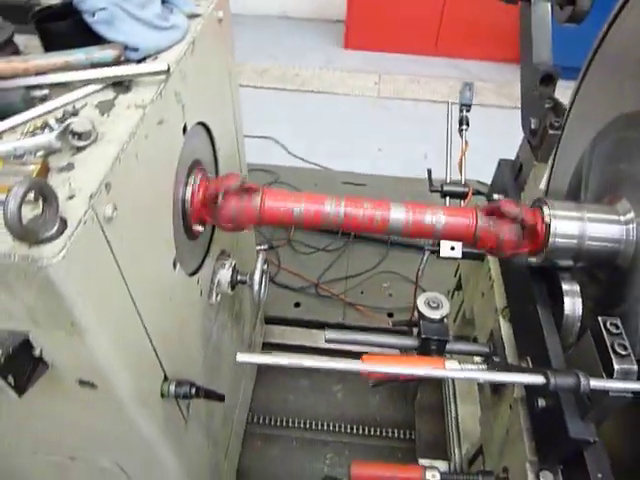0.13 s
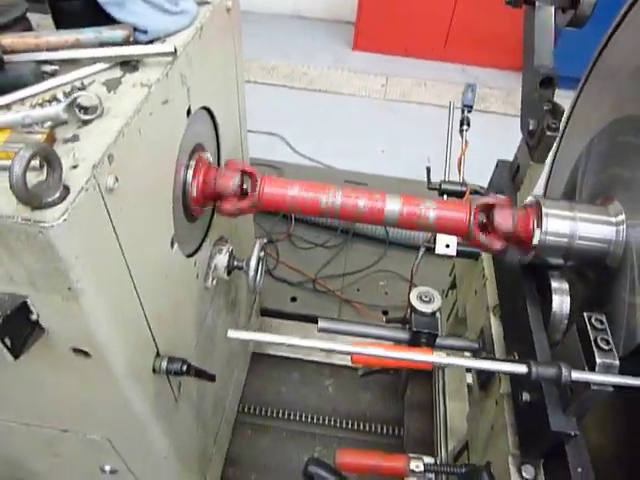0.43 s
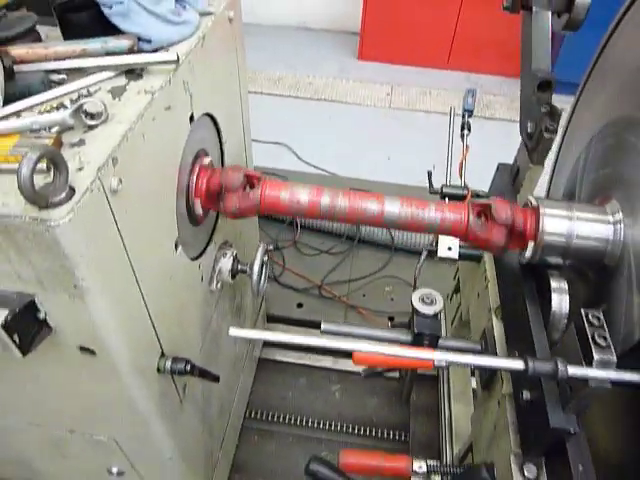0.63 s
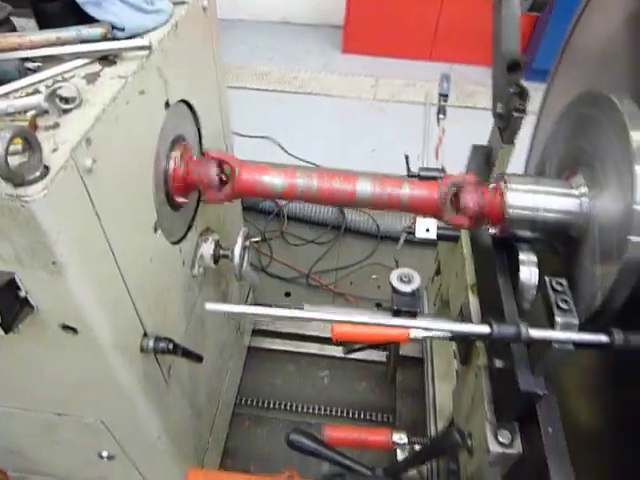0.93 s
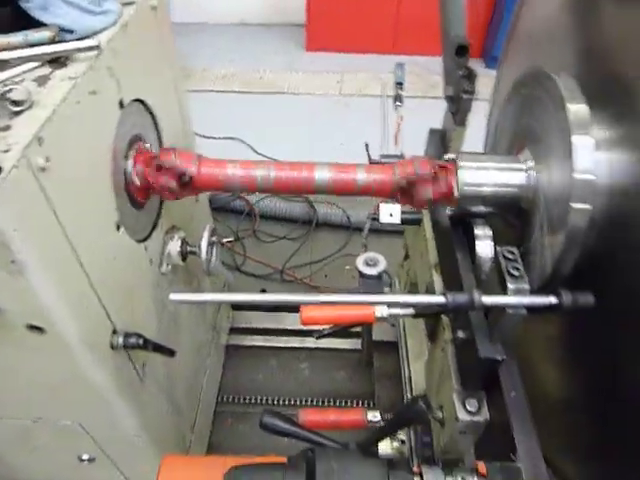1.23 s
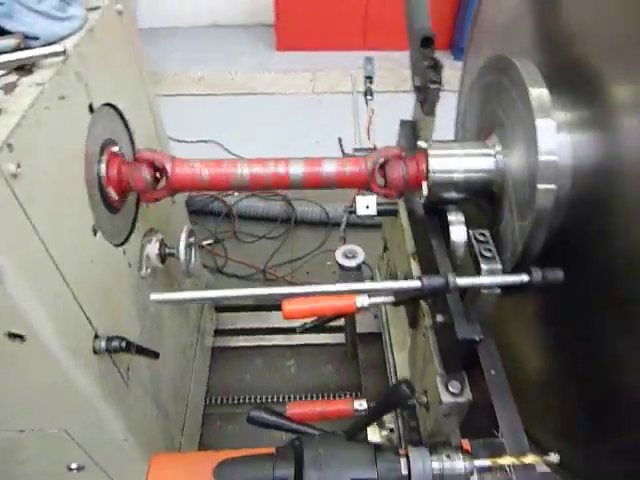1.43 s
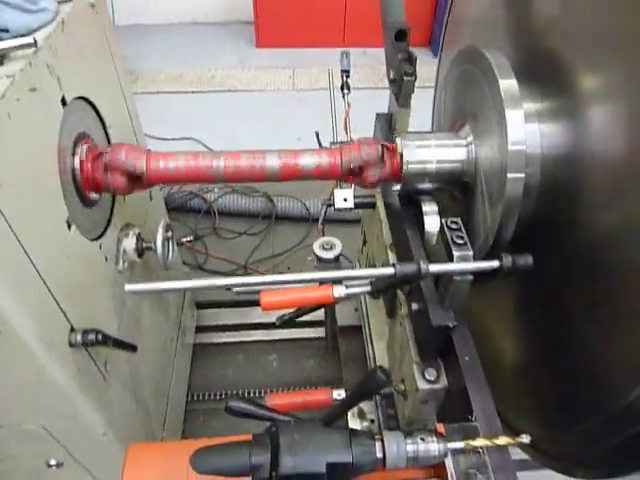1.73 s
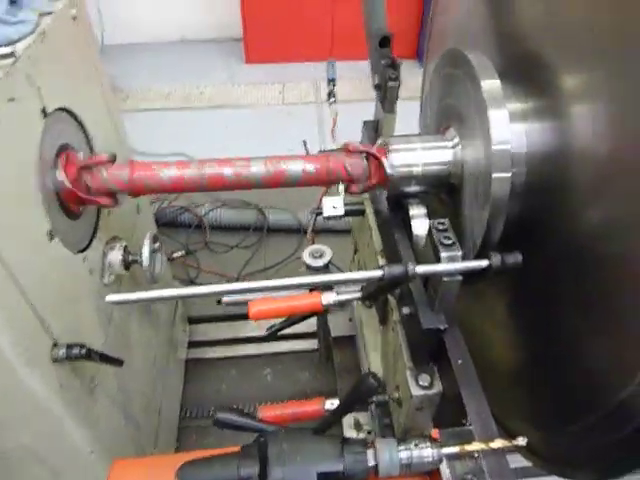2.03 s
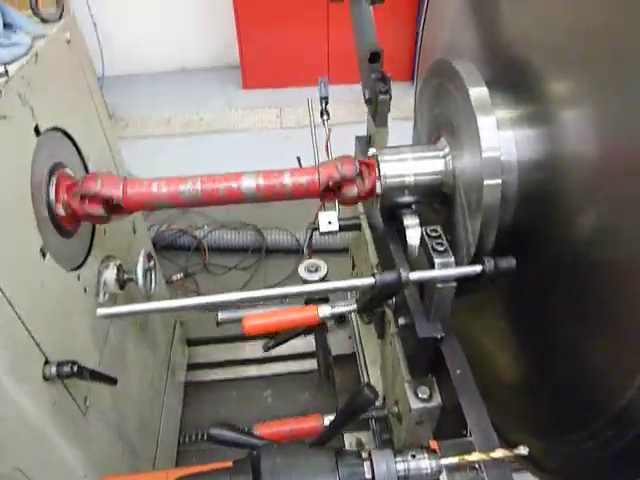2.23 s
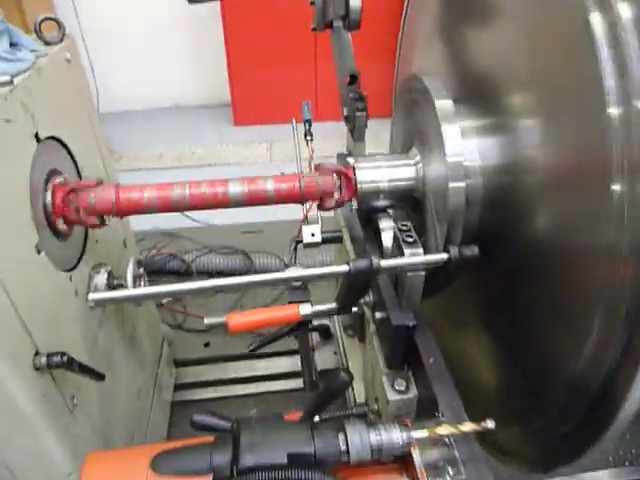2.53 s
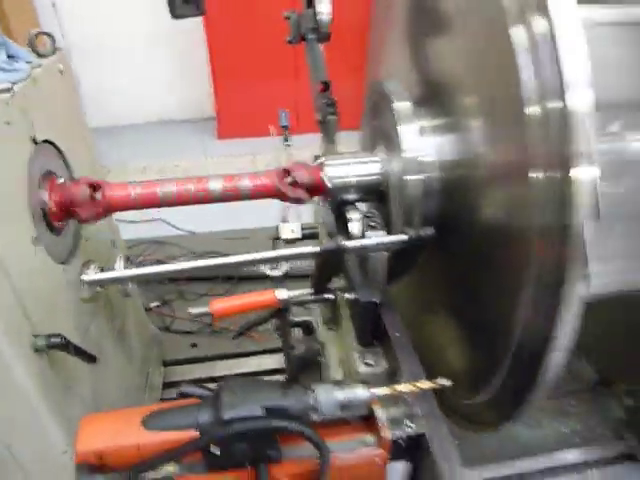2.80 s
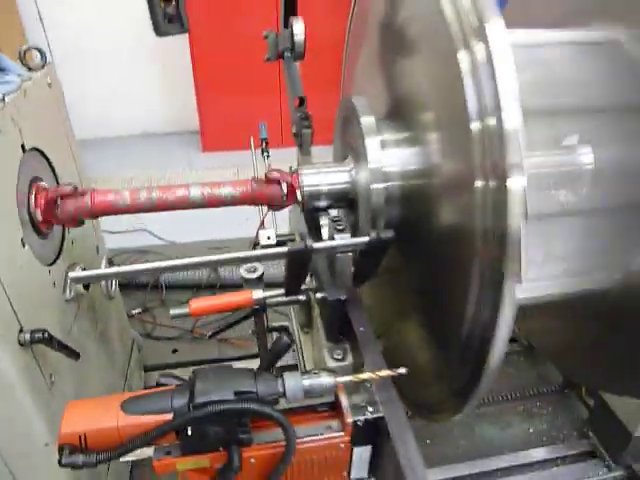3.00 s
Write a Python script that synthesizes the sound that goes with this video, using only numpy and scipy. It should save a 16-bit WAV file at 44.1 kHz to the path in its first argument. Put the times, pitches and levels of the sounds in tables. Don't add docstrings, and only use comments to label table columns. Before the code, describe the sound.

A heavy rotating machine hums loudly and steadily, low and buzzy, over bearing rumble and soft air rush. A tool clacks once early on; the drone then swells and pulses. Indoor workshop, close handheld camera, dull treble.

```python
import sys
import numpy as np
from scipy import signal
from scipy.fft import rfft, irfft, next_fast_len
from scipy.io import wavfile
from scipy.ndimage import uniform_filter1d, map_coordinates

SR = 44100
rng = np.random.default_rng(int(sys.argv[2]) if len(sys.argv) > 2 else 0)


def wav_out(sig):
    wavfile.write(sys.argv[1], SR, np.round(np.clip(np.atleast_2d(sig).T, -1, 1) * 32767).astype(np.int16))


def linear_from_db(decibels):
    return 10 ** (np.asarray(decibels, float) / 20)


N = 139356

# frequency in Hz, density in dB per Hz.
RUMBLE_SPECTRUM = [(15, -67), (25, -52), (107, -9), (179, -8.5), (294, -4.5), (402, -3), (578, -10.5),
                   (904, -13), (1300, -24.5), (1690, -55.5), (2860, -120)]
AIR_SPECTRUM = [(500, -23.5), (1000, 0.5), (1500, 1), (2300, 1), (2800, -7), (4800, -11), (7000, -16),
                (7900, -18.5)]
RUMBLE_DB, AIR_DB = -29.5, -35.5
# frequency in Hz, correlation from 0 to 1.
PORT_LIKENESS = [(200, 1), (330, .9999), (450, .9993), (600, .997), (920, .978), (1580, .85), (2720, .7),
                 (8000, .12)]
# frequency in Hz, difference in dB.
LEFT_OVER_RIGHT_DB = [(60, 0), (530, 0), (920, -1), (1580, -.5), (2720, 0), (4700, 3), (8100, 1)]

# frequency in Hz, wander in Hz, rms in dB, loudest at in seconds,
# again after in seconds.
WHINES = [(782, 4, -50, 1.9, 3.2), (1615, 1.5, -54, .25, 2.8), (2162, 2, -55, 1.5, 2.6),
          (2208, 4, -51, .6, 1.5), (2541, 4, -60, 1, 2), (2788, 8, -61, 2, 2), (5713, 5, -60, 2.05, 3.6)]
# multiple of the ripple, rms in dB, left over right in dB, loudest at in seconds,
# again after in seconds.
BUZZ = [(1, -33, 0, 2.4, 3), (2, -57, 0, 1, 2), (3, -41.5, -.5, 1.5, 1), (4, -55, 0, 2.3, 2.2),
        (5, -53, 2, 1.2, 1.2), (6, -55, 0, .9, .9), (7, -50, 3, 1.5, 3), (8, -49, 4, 1.7, 3),
        (9, -65, 2, 1, 1.5), (10, -61, -2, 2.85, 2), (11, -59, 3, .45, 3.6), (12, -61, 4, 2.7, 1.9),
        (14, -59, 5, 3.05, .74), (15, -62, 7, 1.4, 3.2), (16, -63, 8, 1.5, 3.6), (17, -74, 2, 1, 1),
        (18, -62, 3, 1, 1.3), (19, -70, -1, 2, 1.8), (20, -71, 6, 1, 3.6), (21, -71, 4, .5, 1.6),
        (22, -67, 1, 2, 1.6), (23, -68, 2, 1, 1.4), (24, -71, 5, 1.1, 1), (25, -74, 6, 2, 1.5),
        (26, -74, 3, 1, 1)]
# multiple of a third of the ripple, rms in dB, loudest at in seconds,
# again after in seconds.
RIPPLE_THIRDS = [(40, -66, .5, 1.7), (44, -66, 1.5, 2), (46, -67, 2.5, 1.5), (49, -64, 1.88, 1.05),
                 (55, -72, 1, 1.2), (67, -74, 2, 2)]
RIPPLE_HZ = 300.12
BUZZ_SWAY_DB, BUZZ_STEADY_BELOW_ORDER, STANDING_DB = 1, 8, 5

# frequency in Hz, density in dB.
CLACK_SPECTRUM = [(900, -24), (1500, -10), (2200, -2), (2900, 0), (3400, -2), (3900, -3), (4600, -8),
                  (8000, -14)]
# start in seconds, level in dB.
TOOL_CONTACTS = [
    (.8562, -29),
    (.8598, -31),
    (.8622, -32),
    (.8668, -32),
    (.875, -37),
    (.8815, -37),
]
# frequency in Hz, level in dB, T60 in seconds.
TOOL_MODES = [(1846, -7, .14), (2180, -5, .15), (2546, -10, .09), (2770, 1, .07), (3144, -7, .07),
              (3607, -7, .05), (3900, -8, .035), (3400, 0, .012), (3750, -2, .01)]
CLACK_S, CLACK_DB, CLACK_HOLD_S, CLACK_T60_S = .8561, -32, .014, .08
CLACK_ROOM_DB, ROOM_T60_S = -9, .3

# frequency at the start in Hz, rms in dB.
SHAFT_ORDERS = [(113.7, -52), (137.9, -52), (175.6, -50), (216.7, -49), (219.4, -51), (222.1, -49),
                (225.2, -52), (228.1, -49), (230.8, -50), (233.5, -54), (256.4, -47), (263.1, -49),
                (271.9, -42), (307.5, -48), (316.3, -50), (335.8, -44), (376.1, -62), (378.8, -58),
                (381.5, -58), (384.3, -58), (410.5, -48), (413.2, -47), (415.9, -47), (450.2, -50),
                (461.6, -52), (470.4, -52), (1028, -54), (1037, -52)]
ORDERS_DB, ORDERS_SWAY_DB = -0.5, 2
MESH_HZ, SPEEDUP_HZ_PER_S = 280.5, 6.1
HEAVY_SPOT_S, SCATTER_TURNS = 2.46, .6
# frequency in Hz, width in Hz, lift in dB, faces the camera at in seconds,
# span of that in seconds.
FRAME_MODES = [(240, 21, 9, 1.3, 1.5), (298.4, 9, 9, 4.1, 0.84), (340.5, 17, 7.5, 1.3, 1.6),
               (396, 14, 4.5, 1.9, 0.46), (750, 48, 8, 1.7, 3.7), (1058, 46, 7.5, 1.1, 0.79),
               (2180, 130, 6, 0.5, 1.3)]
OFF_LOBE_DB = -10
# time in seconds, closeness to the frame in dB, closeness to the drive in dB.
CLOSENESS = [(0, 1, -0.5), (.4, 1.5, 0.5), (.8, -1.5, 0.5), (1.2, 0, 1), (1.6, -0.5, 0), (2, 1, 1),
             (2.4, 0, 1), (2.74, 0.5, -0.5), (2.82, 0.5, -0.5), (3.16, -1, 1)]

# time in seconds, frequency in Hz, rms in dB.
BED_LOCK = [(.05, 226, -33), (.14, 232, -28), (.22, 233, -44), (.33, 229, -23.5), (.42, 230, -31),
            (.63, 230, -28), (.69, 230, -48), (.77, 234.5, -23), (.84, 236, -27), (.91, 237, -44),
            (1.15, 238, -27), (1.26, 233, -38), (1.31, 229.5, -28), (1.4, 234, -42), (1.49, 232, -27),
            (1.61, 222, -44), (1.7, 225, -27), (1.79, 232, -36)]
# time in seconds, frequency in Hz, rms in dB.
HOUSING_LOCK = [(.75, 386, -35), (1, 386, -38), (1.12, 391, -30), (1.23, 387, -39), (1.4, 391, -31),
                (1.7, 393, -35), (1.8, 395.7, -28), (1.92, 398, -33), (2.02, 398, -25), (2.1, 397.5, -27),
                (2.2, 397.3, -23), (2.28, 397.1, -30), (2.45, 398.2, -23), (2.72, 399.2, -23.5),
                (2.78, 399, -38), (2.95, 398, -32), (3.08, 399, -42)]
LOCK_PAN_DB = [
    [0],
    [-.5],
]
LOCK_DB, UNLOCKED_DB = -1, -60
# time in seconds, rms in dB.
MESH_LEVEL = [(0, -38), (.3, -36), (.6, -40), (.8, -33), (1.05, -30.5), (1.25, -32), (1.5, -27.5), (2, -28),
              (2.45, -29), (2.76, -29), (2.84, -45), (3.16, -40)]
MESH_LEAD_TURNS = -.21

# frequency in Hz, width in Hz.
LENS_NOTCHES = [(5430, 550), (7915, 190)]
# frequency in Hz, gain in dB.
RESAMPLER = [(7000, 0.5), (7700, -3.5), (8000, -10.5), (8200, -12), (8500, -17), (8750, -26), (8900, -34)]
CAMERA_RATE_HZ = 16000


def unit(x):
    return x / np.sqrt(np.mean(x ** 2) + 1e-20)


def along(points, hz):
    f, v = np.transpose(points)
    return np.interp(np.log(hz + 1), np.log(f + 1), v)


def curve(rows, axis):
    rows = np.transpose(rows)
    return np.interp(np.arange(N) / SR, rows[0], rows[axis])


def wobble(rate_hz, count):
    knots = rng.standard_normal((count, 64))
    at = np.arange(0, N + 64, 64) * rate_hz / SR
    slow = np.array([map_coordinates(k, [at], mode="mirror") for k in knots])
    return np.repeat(uniform_filter1d(slow, size=3), 64, axis=1)[:, :N]


def filtered(x, response):
    m = next_fast_len(N + SR // 2)
    return irfft(rfft(x, m) * response(np.fft.rfftfreq(m, 1 / SR)), m)[..., :N]


def rush(spectrum, patchy_db):
    z = signal.stft(rng.standard_normal((2, N)), nperseg=512)[2]
    field = uniform_filter1d(rng.standard_normal(z.shape[1:]), size=5, axis=0)
    field = uniform_filter1d(field, size=12, axis=1)
    pair = signal.istft(z * linear_from_db(patchy_db * unit(field)), nperseg=512)[1][:, :N]
    turn = lambda hz: np.arccos(np.clip(along(PORT_LIKENESS, hz), -1, 1)) / 2
    mid, side = filtered(pair, lambda hz: linear_from_db(along(spectrum, hz)) * [np.cos(turn(hz)), np.sin(turn(hz))])
    return unit(np.array([mid + side, mid - side]))


def tones(cycles, hz, level_db, pan_db, scatter_turns):
    phase = 2 * np.pi * (cycles + scatter_turns * rng.uniform(-0.59, 0.44, (len(hz), 1)))
    spread = np.arccos(np.clip(along(PORT_LIKENESS, hz), -1, 1))[:, None]
    lag = spread * wobble(1.1, count=len(hz)) / 2
    gain = np.sqrt(2) * linear_from_db(level_db)
    port = lambda side: np.sum(gain * linear_from_db(side * pan_db / 2) * np.cos(phase + side * lag), axis=0)
    return np.array([port(1), port(-1)])


def standing_db(at_s, again_s):
    return STANDING_DB * np.cos(2 * np.pi * (np.arange(N) / SR - at_s) / again_s)


def rumble_and_air():
    rumble = linear_from_db(RUMBLE_DB) * rush(RUMBLE_SPECTRUM, patchy_db=1.5)
    return rumble + linear_from_db(AIR_DB) * rush(AIR_SPECTRUM, patchy_db=0.8)


def whines():
    hz, wander_hz, db, at_s, again_s = np.transpose(WHINES)[:, :, None]
    cycles = np.cumsum(hz + wander_hz * wobble(9, count=len(hz)), axis=1) / SR
    level_db = db + standing_db(at_s, again_s) + 3 * wobble(8, count=len(hz))
    return tones(cycles, hz[:, 0], level_db, 1.4, 0.86)


def rectifier_buzz():
    t = np.arange(N) / SR
    between = [(n / 3, db, 4, *lobe) for n, db, *lobe in RIPPLE_THIRDS]
    order, db, pan_db, at_s, again_s = np.transpose(BUZZ + between)[:, :, None]
    swayed = np.minimum((order / BUZZ_STEADY_BELOW_ORDER) ** 2, 1)
    sway_db = swayed * (standing_db(at_s, again_s) + BUZZ_SWAY_DB * wobble(2.45, count=len(order)))
    cycles = RIPPLE_HZ * order * (t - HEAVY_SPOT_S)
    level_db = db + sway_db + curve(CLOSENESS, axis=2)
    return tones(cycles, RIPPLE_HZ * order[:, 0], level_db, pan_db, np.minimum(order - 1, 1))


def clack():
    t = np.arange(N) / SR - CLACK_S
    after = np.maximum(t - CLACK_HOLD_S, 0)
    rattle = linear_from_db(-60 * after / CLACK_T60_S)
    room = linear_from_db(CLACK_ROOM_DB - 60 * after / ROOM_T60_S)
    sound = linear_from_db(CLACK_DB) * (t > 0) * (rattle + room) * rush(CLACK_SPECTRUM, patchy_db=-4.5)
    u = np.arange(SR // 4) / SR
    hz, db, t60_s = np.transpose(TOOL_MODES)[:, :, None]
    for start_s, blow_db in TOOL_CONTACTS:
        turns = rng.random((len(hz), 1)) + .15 * rng.random((2, len(hz), 1))
        ring = linear_from_db(blow_db + db - 60 * u / t60_s) * np.sin(2 * np.pi * (hz * u + turns))
        first = round(start_s * SR)
        sound[:, first:first + len(u)] += ring.sum(axis=1)
    return sound


def shaft_orders():
    t = np.arange(N) / SR
    hz, db = np.transpose(SHAFT_ORDERS)
    turned = lambda s: s + SPEEDUP_HZ_PER_S / MESH_HZ * s * s / 2
    cycles = hz[:, None] * (turned(t) - turned(HEAVY_SPOT_S))
    level_db = db[:, None] + ORDERS_DB + ORDERS_SWAY_DB * wobble(2.96, count=len(hz))
    return tones(cycles, hz, level_db, 0, SCATTER_TURNS)


def frame():
    t = np.arange(N) / SR
    drive = shaft_orders() + rumble_and_air()
    sound = drive
    for c, w, lift_db, at_s, span_s in FRAME_MODES:
        lobe = linear_from_db(OFF_LOBE_DB * (1.5 - np.exp(-((t - at_s) / span_s) ** 2)))
        ringing = filtered(drive, lambda f: 1j * f * w / (c * c - f * f + 1j * f * w))
        sound = sound + (linear_from_db(lift_db) - 1) * lobe * ringing
    low = filtered(sound, lambda f: 1 / (1 + (f / 480) ** 6))
    return sound + (linear_from_db(curve(CLOSENESS, axis=1)) - 1) * low


def locked_modes():
    tables = []
    for rows in (BED_LOCK, HOUSING_LOCK):
        before = (rows[0][0] - .05, rows[0][1], UNLOCKED_DB)
        after = (rows[-1][0] + .05, rows[-1][1], UNLOCKED_DB)
        tables.append([before, *rows, after])
    hz = np.array([curve(rows, axis=1) for rows in tables])
    db = uniform_filter1d(np.array([curve(rows, axis=2) for rows in tables]), size=900)
    return tones(np.cumsum(hz, axis=1) / SR, hz[:, 0], db + LOCK_DB, np.array(LOCK_PAN_DB), 0.92)


def gear_mesh():
    t = np.arange(N) / SR - HEAVY_SPOT_S
    hz_at_spot = MESH_HZ + SPEEDUP_HZ_PER_S * HEAVY_SPOT_S
    cycles = MESH_LEAD_TURNS + hz_at_spot * t + SPEEDUP_HZ_PER_S * t * t / 2
    level_db = curve(MESH_LEVEL, axis=1) + .5 * wobble(4.5, count=1)
    return tones(cycles[None], np.array([MESH_HZ]), level_db, 0, 0)


def scene():
    ports = np.array([[.5], [-.5]])
    body = filtered(frame() + clack(), lambda f: linear_from_db(along(LEFT_OVER_RIGHT_DB, f) * ports))
    return body + whines() + rectifier_buzz() + locked_modes() + gear_mesh()


def roll_off(x):
    return signal.sosfilt(signal.butter(12, 8830, fs=SR, output="sos"), x)


def record(dry):
    notch = lambda f: np.prod([(c * c - f * f) / (c * c - f * f + 1j * f * w) for c, w in LENS_NOTCHES], axis=0)
    x = filtered(dry, lambda f: notch(f) * (f < CAMERA_RATE_HZ / 2))
    x = x + 2 * x * np.cos(2 * np.pi * CAMERA_RATE_HZ * np.arange(N) / SR)
    x = filtered(x, lambda f: linear_from_db(along(RESAMPLER, f)) * (f < 9000))
    return roll_off(x)


dry = scene()
out = record(dry)
wav_out(out)
```